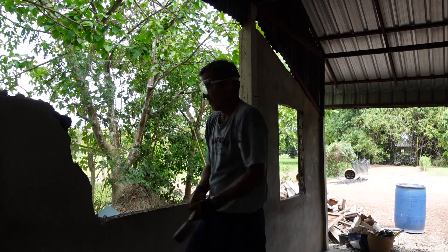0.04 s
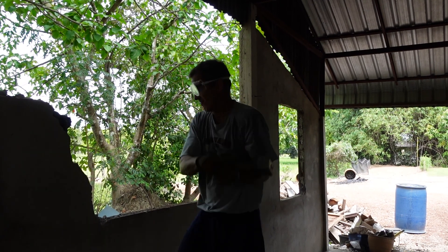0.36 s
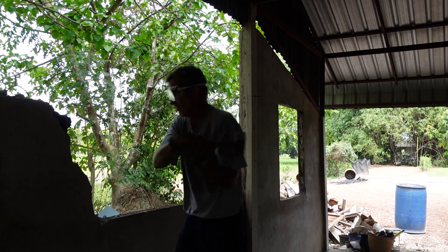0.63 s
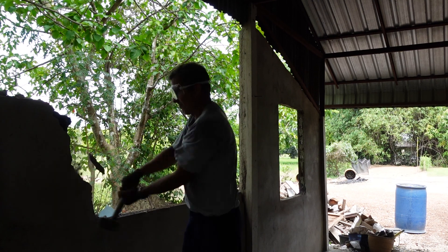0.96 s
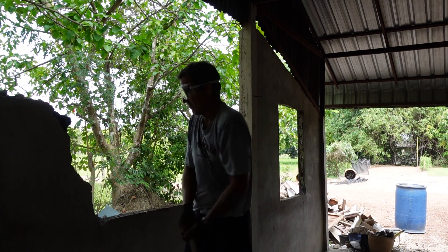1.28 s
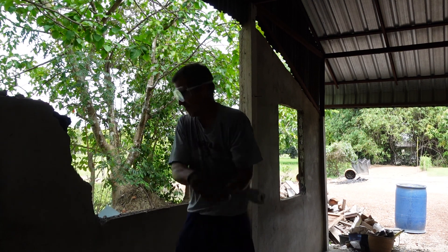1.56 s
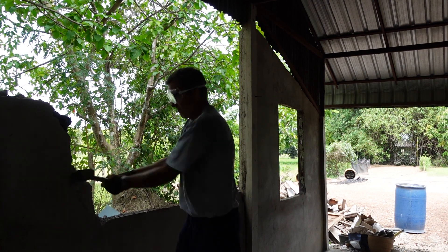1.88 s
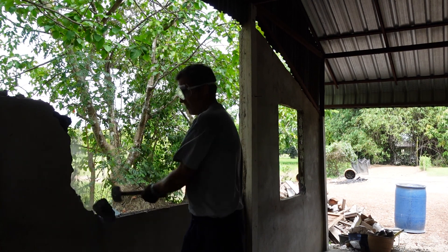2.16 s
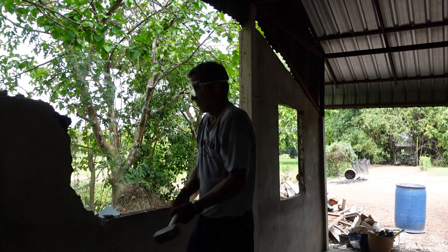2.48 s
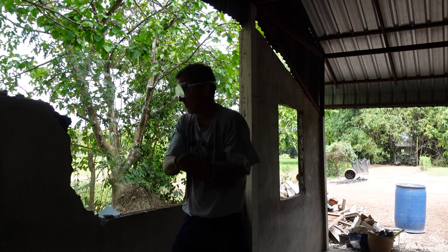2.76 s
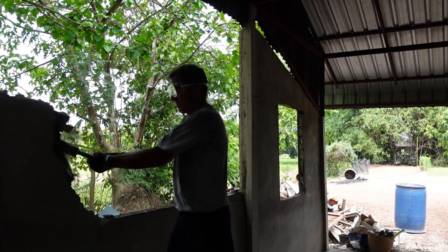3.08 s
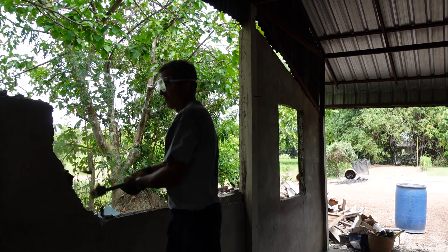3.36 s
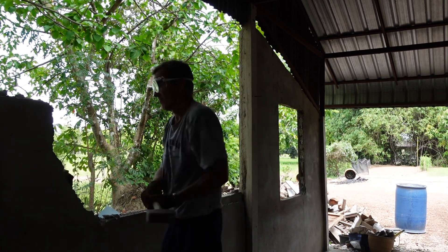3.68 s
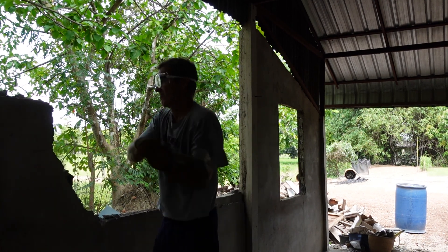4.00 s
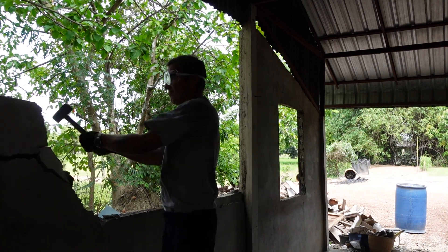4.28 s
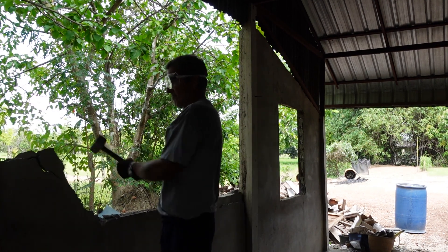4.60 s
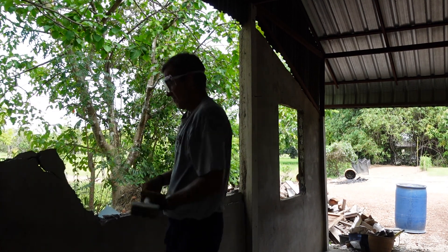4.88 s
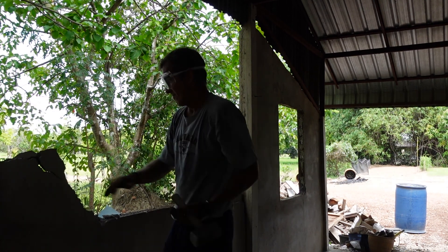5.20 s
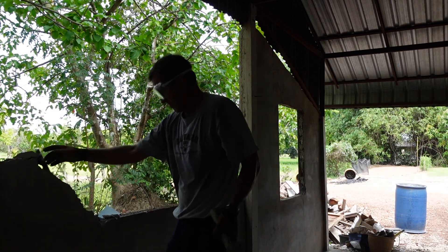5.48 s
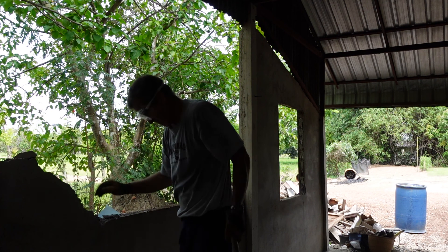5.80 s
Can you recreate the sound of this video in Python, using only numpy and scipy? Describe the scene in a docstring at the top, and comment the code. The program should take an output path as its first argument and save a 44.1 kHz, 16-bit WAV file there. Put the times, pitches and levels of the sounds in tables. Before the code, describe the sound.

Pieces of broken brick and grit clatter onto rubble from the start. At about 0.9 seconds a sledgehammer hits a brick wall with a sharp crack and thud, booming through an open-sided, metal-roofed shed and leaving a low hum in the wall. Further blows land at about 1.9, 3.1 and 4.3 seconds, the last two with a clearer thin, high ring from the steel head. Between them, lumps knock, shards clink and grit showers down, with a strong spill from 2.4 to 2.9 seconds and the loudest chunks landing around 3.6 seconds. Another collapse of debris runs from about 4.5 to 5.5 seconds, then thins to scattered knocks near 6 seconds. Tiny ticks of trickling mortar and faint outdoor air continue underneath. The stereo microphone is close, dipping in level and overloading slightly on the loudest impacts.

```python
"""A sledgehammer strikes a rendered brick wall four times, in an open-sided shed with a metal roof.
Each blow cracks and booms through the shed while the wall hums and the steel head rings.
Lumps, chips and grit clatter onto the rubble throughout, and mortar trickles over faint outdoor air.
The stereo camera microphone stands close: it pulls its gain down on loud moments and still overloads."""
import sys
import numpy as np
from scipy import signal
from scipy.fft import rfft, irfft, next_fast_len
from scipy.io import wavfile

SR = 44100
rng = np.random.default_rng(int(sys.argv[2]) if len(sys.argv) > 2 else 0)


def master(y):
    """Save y as 16-bit WAV."""
    cut = np.clip(np.atleast_2d(y).T, -1, 1)
    pcm = np.round(cut * 32767)  # scale
    wavfile.write(sys.argv[1], SR, pcm.astype(np.int16))


N = 261947
TIME = np.arange(N) / SR
BANDS_HZ = 40 * 2 ** (np.arange(18) / 2)   # half an octave apart
CUTOFF_HZ = 16000
# stereo width of diffuse sound at the microphone: frequency_hz, side_minus_mid_db
STEREO_WIDTH = [(60, -8), (110, -27), (200, -21.5), (380, -17), (700, -13.5), (1290, -14), (2380, -15),
                (4400, -9), (8120, -9.5), (15000, -11)]


def amp(db):
    """Decibels to gain."""
    return np.exp(np.asarray(db) * (np.log(10) / 20))


def rms(x):
    """Root mean square."""
    return np.sqrt(np.mean(x ** 2) + 1e-20)


def at_hz(points, hz):
    """Read a table on a log-frequency axis."""
    f, value = np.transpose(points)
    return np.interp(np.log(hz), np.log(f), value)


def add(out, s, sound):
    """Mix a sound in from time s."""
    start = max(round(s * SR), 0)
    out[:, start:start + sound.shape[-1]] += sound[..., :N - start]


def band(x, hz, octaves=1 / 4, order=2):
    """Band-pass reaching the given octaves to each side of hz."""
    high = min(hz * 2 ** octaves, SR * 9 / 20)
    low = min(hz / 2 ** octaves, high / 2 ** (1 / 8))
    return signal.sosfilt(signal.butter(order, [low, high], "band", fs=SR, output="sos"), x)


def fade(t60, size):
    """Exponential decay, 60 dB down after t60 seconds."""
    return np.exp(-np.log(1000) * TIME[:size] / max(t60, 1 / 1000))


def ring(hz, t60, size=SR):
    """One struck mode."""
    return np.sin(2 * np.pi * hz * TIME[:size]) * fade(t60, size)


def diffuse_noise(hz, size):
    """Half an octave of diffuse sound at two closely spaced capsules."""
    mid, side = rng.standard_normal((2, size))
    return band(mid + amp(at_hz(STEREO_WIDTH, hz)) * side * [[1], [-1]], hz)


def outdoor_air(level_db=-30):
    """Faint, steady background from outside the shed."""
    # colour of the open air: frequency_hz, density_db
    air_colour = [(40, -28), (80, -4), (140, -3), (300, -5.5), (1000, -10), (4000, -9.5), (15000, -23.5)]
    size = next_fast_len(N)
    hz = np.maximum(np.arange(size // 2 + 1) * SR / size, 1)
    mid, side = rfft(rng.standard_normal((2, size))) * amp(at_hz(air_colour, hz))
    noise = irfft(mid + amp(at_hz(STEREO_WIDTH, hz)) * side * [[1], [-1]], size)[:, :N]
    return amp(level_db) * noise / rms(noise)


def spill_flow(start_s, swell_s, pour_s, t60):
    """Power of one spill over time: it swells, pours steadily, then settles."""
    rise = np.clip((TIME - start_s) / swell_s, 0, 1)
    settling_s = np.maximum(TIME - start_s - swell_s - pour_s, 0)
    fall_db = np.minimum(60 * settling_s / t60, 200)
    return (rise * amp(-fall_db)) ** 2


def spill_levels(size_spread_octaves=0.63):
    """Gain of all spills per band over time: lumps sound low, grit high, mixed sizes broad."""
    # spills of masonry: start_s, octave_level_db, swell_s, pour_s, t60_s, pitch_hz, skirt_db_per_octave
    spills = [(0.0, -11.5, 0.0013, 0.13, 2, 5020, 8), (0.027, -15, 0.02, .017, 0.44, 620, 3.5),
              (0.13, -19, .08, 0.11, 1.1, 14000, 20), (0.36, -16.5, 0.015, 0.031, 0.42, 4440, 4.5),
              (0.54, -16, 0.0071, 0.014, 0.31, 1270, 4.5), (0.615, -21, .009, 0.056, 0.92, 2580, 12.5),
              (1.166, -22, 0.013, 0.14, 0.63, 383, 4.5), (1.295, -22.5, 0.025, .06, 0.52, 1520, 12.5),
              (1.437, -28.5, 0.019, 0.13, 0.86, 4800, 1.5), (1.55, -16.5, 0.014, 0.021, 1.1, 3300, 5),
              (1.698, -32, 0.029, .4, .7, 1930, 8), (2.188, -20.5, 0.017, 0.095, 0.33, 830, 7.5),
              (2.376, -18, 0.029, 0.13, .59, 1590, 9), (2.40, -24.5, 0.011, .09, .4, 14000, 18),
              (2.49, -12, 0.029, 0.081, 0.44, 2330, 6), (2.597, -13.5, 0.054, 0.029, .28, 3800, 7.3),
              (2.705, -6.5, 0.01, 0.016, 0.78, 740, 5.5), (2.731, -9.5, 0.018, 0.05, 1.1, 4400, 14),
              (3.078, -7.5, 0.098, .038, 0.56, 513, 5), (3.149, -17, 0.092, .164, 0.9, 1070, 12),
              (3.544, 0.3, 0.066, 0.028, 0.19, 2140, 8), (3.67, -12, 0.0057, 0.02, 0.32, 740, 1),
              (3.688, -12.5, 0.03, .246, .67, 2900, 3.5), (4.102, -19.5, .007, 0.071, 0.46, 6300, 3.5),
              (4.54, -14, 0.027, .005, 0.57, 533, 5), (4.729, -19, 0.0026, 0.0024, 0.13, 4130, 12.5),
              (4.867, -22, 0.0072, 0.057, 0.82, 5930, 6), (4.894, -11, 0.17, .023, 0.59, 4300, 8),
              (5.038, -9.5, .015, 0.0083, 0.37, 1270, 4.5), (5.064, -12, .013, 0.058, 1.3, 2220, 4.5),
              (5.27, -17.5, 0.0035, 0.017, 0.89, 3750, 2), (5.386, -17, 0.0055, 0.059, 0.45, 1040, 2.5),
              (5.507, -20, 0.0079, .01, .44, 446, 6.4), (5.578, -24.5, 0.035, 0.021, 0.71, 4100, 2),
              (5.716, -23.5, .004, 0.023, 0.87, 2290, 6)]
    _, db, _, _, _, pitch, skirt = np.transpose(spills)
    flows = np.array([spill_flow(s, swell, pour, t60) for s, _, swell, pour, t60, _, _ in spills])
    octaves_off = np.hypot(np.log2(BANDS_HZ[:, None] / pitch), size_spread_octaves) - size_spread_octaves
    octave_share = BANDS_HZ[:, None] * np.log(2) / (SR / 2)
    power_density = amp(db - skirt * octaves_off) ** 2 / octave_share
    return np.sqrt(power_density @ flows)


def impacts(per_s, spread_db, count=12000):
    """Impacts of uneven strength at random moments: (sample numbers, signed sizes)."""
    wait, size, sign = rng.random((count, 3)).T
    at = np.cumsum(-np.log(1 - wait) * SR / per_s).astype(int)
    sizes = amp(-spread_db * np.log(np.maximum(size, 1 / 50))) * np.sign(sign - .5)
    return at[at < N], sizes[at < N]


def chip_rings(hz, per_s=100, t60_cycles=65, count=4):
    """Chips of about one size bounce at random, each ringing briefly at a pitch of its own."""
    out = np.zeros(N)
    for f in hz * 2 ** ((np.arange(count) + rng.random(count)) / (2 * count) - 1 / 4):
        at, sizes = impacts(per_s / count, spread_db=-1.0, count=1000)
        bounces = np.bincount(at, sizes, N) + 1e-18
        angle = 2 * np.pi * f / SR
        decay = np.exp(-np.log(1000) * f / (t60_cycles * SR))
        out += signal.lfilter([np.sin(angle)], [1, -2 * decay * np.cos(angle), decay * decay], bounces)
    return out / rms(out)


def rubble(grains_per_s=800, grain_db=-16, colour_spread_db=7, wash_db=-1, chip_db=-5):
    """A shower of small impacts and ringing chips inside the wash of their reflections."""
    # colour of the heap they land on: frequency_hz, gain_db
    heap_colour = [(40, -79), (80, -36), (140, -6), (300, -8), (550, -4.5), (900, -4.5), (1700, -0.5),
                   (3000, -3), (5000, -1.5), (8000, -2.5), (11000, -1.3), (15000, -9)]
    at, sizes = impacts(grains_per_s, spread_db=1.5)
    colours = amp(colour_spread_db * rng.uniform(-2, 2, (12000, len(BANDS_HZ))))[:len(at)]
    out = np.zeros((2, N))
    for hz, colour, level in zip(BANDS_HZ, colours.T, spill_levels()):
        clicks = np.bincount(at, sizes * colour, N)   # every impact has its own colour
        wash = diffuse_noise(hz, N)
        direct_db = grain_db - max(np.log2(hz / 2000), 0)   # 1 dB softer per octave in the treble
        sound = amp(direct_db) * band(clicks / rms(clicks) + 1e-18, hz) + amp(wash_db) * wash
        if 250 < hz < 7500:   # grit is too small to ring
            sound += amp(chip_db) * rms(wash) * chip_rings(hz)
        out += level * amp(at_hz(heap_colour, hz)) * sound
    return out


def fracture(hz, octaves, t60, size=SR // 4):
    """A brittle contact: a burst of tiny breaks coloured by the size of the piece."""
    envelope = fade(t60, size)
    burst = band(rng.standard_normal(size) * envelope, hz, max(octaves, 1 / 10), order=1)
    bass_cut = signal.butter(2, hz / 2 ** (octaves + 1), "high", fs=SR, output="sos")
    burst = signal.sosfilt(bass_cut, burst)   # a small piece radiates no bass
    return .5 * burst * rms(envelope) / rms(burst)


def clack(hz, octaves, t60, longest_cycles=110, count=6, size=SR // 4):
    """A lump of brick struck once: unrelated modes around its pitch, the higher ones dying first."""
    steps = (np.arange(count) + rng.random(count)) / count * 2 - 1
    modes_hz = np.minimum(hz * 2 ** (octaves * steps), CUTOFF_HZ)
    weights = np.exp(-steps ** 2) * rng.choice([-1, 1], count)
    body = sum(w * ring(f, min(t60, longest_cycles / f), size) for f, w in zip(modes_hz, weights))
    return body / np.sqrt(2 * np.sum(weights ** 2))


def crumbly_contact(knock, hz, octaves):
    """A crumbly contact takes a moment: the larger the piece, the less treble it gives."""
    top_hz = np.clip(3.4 * hz * 2 ** octaves, 200, SR * 9 / 20)
    return signal.sosfilt(signal.butter(2, top_hz, fs=SR, output="sos"), knock)


def shed_tail(colour, decay_scale, bass_cut_db=7.5, bass_cut_hz=330, size=SR * 5 // 4):
    """Dense reflections off roof, walls and floor; the bass starts softer and lingers longer."""
    # reverberation of the shed: frequency_hz, t60_s
    shed_decay = [(50, 4.8), (140, 2), (300, 0.98), (700, 0.53), (2000, 0.61), (5000, 0.56), (10000, 0.53),
                  (16000, 0.091)]
    tail = np.zeros((2, size))
    for hz in BANDS_HZ:
        db = at_hz(colour, hz) - bass_cut_db / (1 + (hz / bass_cut_hz) ** 4)
        tail += amp(db) * diffuse_noise(hz, size) * fade(decay_scale * at_hz(shed_decay, hz), size)
    return tail


def shimmer(hz, t60, width_hz, size=SR):
    """A high mode reaching the microphone over many paths: its level and phase wander at random."""
    blur = signal.butter(2, width_hz, fs=SR, output="sos")
    paths = signal.sosfilt(blur, rng.standard_normal((2, size + SR // 10)))[:, -size:]
    phase = 2 * np.pi * hz * TIME[:size]
    tone = paths[0] * np.cos(phase) + paths[1] * np.sin(phase)
    return tone / (np.sqrt(2) * rms(paths)) * fade(t60, size)


def falling_pieces(tick_db=-2, crunch_db=-3, body_db=1, pan_spread_db=1, echo_db=-5):
    """Larger pieces land with a tick, a crunch and a clack; shards ring; the shed answers."""
    # single pieces landing: start_s, level_db, pitch_hz, spread_octaves, t60_s
    knocks = [(0.023, -1.5, 2860, 0.44, 0.094), (0.084, 4, 695, 1.6, 0.012),
              (0.392, -7.5, 3070, 1.1, 0.049), (0.449, -7, 2580, 0.27, 0.055),
              (.5235, -6.5, 11000, 0.89, 0.022), (0.5473, -13, 1165, 1.46, 0.033),
              (0.6233, -1, 6600, 0.76, 0.021), (0.67, -7, 2450, 0.44, 0.01),
              (0.7379, 2, 2182, 1.35, 0.0064), (0.844, -10, 1710, 0.29, .015),
              (1.345, -17, 1790, 0.38, .08), (1.558, -7, 2240, 0.63, 0.23),
              (1.7054, 0.5, 1940, 0.37, 0.0079), (1.798, -10, 1420, 0.49, 0.017),
              (1.855, -9, 1800, 0.48, 0.01), (1.88, -18, 3420, 0.99, 0.015), (1.922, -8, 825, 0.33, .05),
              (2.400, -6, 1790, 0.7, 0.017), (2.118, 0.5, 1317, 0.45, 0.04),
              (2.2174, 0, 1610, 0.73, 0.0092), (2.276, -2, 4220, 0.9, 0.013), (2.339, 1, 1630, 0.29, 0.015),
              (2.412, -5, 1286, 0.55, 0.039), (2.5161, 1, 3020, 0.35, 0.052), (2.574, -1, 2215, 0.41, 0.17),
              (2.7059, 4.5, 1175, 0.5, 0.05), (2.722, 3, 813, 0.5, 0.1), (2.7435, -1.5, 4900, 0.25, 0.15),
              (2.76, -17, 557, 0.27, 0.17), (2.9099, -1.5, 3940, 0.9, 0.063), (2.917, 2.5, 633, 1.4, 0.017),
              (3.082, -6.5, 928, 1.46, 0.038), (3.3774, -0.5, 2186, 1.14, 0.041),
              (3.505, -4.5, 2280, 1.4, 0.018), (3.546, -5.5, 1695, 0.98, 0.22),
              (3.567, 12.5, 1624, 0.4, 0.36), (3.654, 6, 2996, 0.097, 0.079),
              (3.6746, 12.5, 835, 0.43, 0.022), (3.723, -2.5, 10100, 0.63, 0.17),
              (3.779, 0.5, 2100, 0.75, 0.092), (3.82, -2.5, 1068, 0.5, 0.083),
              (4.1078, -4.5, 1604, 0.6, 0.047), (4.109, -13, 12500, 0.3, .025),
              (4.125, -5.5, 9500, 0.41, 0.093), (4.2459, 0, 1474, 0.5, 0.083), (4.249, 1, 9600, .7, 0.0098),
              (4.483, -2, 812, 1.0, 0.058), (4.5796, -5, 1570, 1, 0.042), (4.7307, -4, 2600, 0.14, 0.016),
              (4.7857, -6.5, 1120, 1.34, 0.014), (4.8742, -5, 6450, 0.41, 0.018),
              (4.980, -10.5, 1420, 1.64, 0.058), (5.031, -6, 2000, 0.73, 0.037),
              (5.056, 2.5, 470, 1.05, 0.051), (5.081, 4.5, 2000, 0.51, 0.21),
              (5.154, -3, 1500, 1.62, 0.058), (5.272, -1, 1820, 1.05, 0.017),
              (5.3893, 2.5, 777, 0.58, 0.03), (5.391, 2, 4550, 0.7, 0.023), (5.4263, -4, 3210, 0.77, 0.074),
              (5.465, -9.5, 237, 0.33, 0.12), (5.5917, -12, 3080, 0.87, 0.04),
              (5.722, -9, 2180, 1.34, 0.014), (5.7446, 0, 1196, 0.51, 0.027),
              (5.8654, -15.5, 1720, 0.61, 0.04)]
    # ringing shards and hollow bricks: start_s, pitch_hz, level_db, t60_s
    clinks = [(0.327, 6300, -17, 0.18), (0.328, 11500, -19, 0.2), (.326, 14800, -20, 0.14),
              (.523, 14400, -19, .06), (.528, 6300, -18.5, 0.21), (3.654, 2930, -9, 0.12),
              (3.905, 500, -10, 0.22), (3.941, 465, -16, 0.2), (4.733, 2900, -20, 0.26),
              (5.276, 8750, -23, 0.5), (5.306, 8680, -15, 0.27), (5.31, 3650, -11.5, 0.2),
              (5.43, 3720, -19, 0.39), (5.4955, 3870, -14.5, 0.17)]
    out = np.zeros((2, N))
    for s, db, hz, octaves, t60 in knocks:
        tick = amp(tick_db) * fracture(hz, octaves + 1, t60=0.0011)
        crunch = amp(crunch_db) * fracture(hz, octaves, t60)
        body = amp(body_db) * clack(hz, octaves, t60)
        pan_db = pan_spread_db * rng.normal() * np.array([[1], [-1]])
        add(out, s, amp(db + pan_db) * crumbly_contact(tick + crunch + body, hz, octaves))
    for s, hz, db, t60 in clinks:
        add(out, s, amp(db) * shimmer(hz, t60, width_hz=min(170, 0.072 * hz)))
    room = shed_tail(colour=[(100, 0.32), (12000, -2.3)], decay_scale=0.61)
    echo = signal.fftconvolve(out, room / np.sqrt(np.sum(room[0] ** 2)), axes=1)[:, :N]
    return out + amp(echo_db) * echo


def mortar_trickle(ticks_per_s=22, faintest_db=-31, spread_db=5.5, centre_hz=11500):
    """Grains of mortar keep dropping from the broken edge: faint, high ticks at random moments."""
    out = np.zeros((2, N))
    wait, size, pitch = rng.random((200, 3)).T
    times = np.cumsum(-np.log(1 - wait)) / ticks_per_s
    levels = faintest_db - spread_db * np.log(np.maximum(size, 1 / 20))
    pitches = centre_hz * 2 ** (.5 * (pitch - .5))
    for s, db, hz in zip(times, levels, pitches):
        if s < N / SR:
            add(out, s, amp(db) * fracture(hz, octaves=.5, t60=0.032, size=SR // 20))
    return out


def sledgehammer(thud_db=-9, boom_build_s=0.00033, steel_build_s=0.012):
    """Each blow: a crack and a thud, the boom of the shed, the humming wall and the ringing steel head."""
    # blows on the wall: start_s, crack_db, crack_hz, boom_db, boom_decay_scale, wall_db, steel_db
    blows = [(0.884, 20.5, 775, 6, 1, -11, -11), (1.9493, 22, 2180, 6, 0.86, -17, -44),
             (3.1184, 24.5, 830, 7.5, 0.93, -9, -4.5), (4.2575, 19.5, 880, 5, 1, -13.5, -8)]
    # colour of each blow's boom: frequency_hz, density_db
    first_boom = [(24, -54), (40, -29), (96, -17.5), (220, 1.5), (312, -5), (467, 0), (965, -1.5),
                  (1270, 1), (2840, -7.5), (9220, -26.5), (10400, -31), (11800, -41), (14800, -34),
                  (16000, -44)]
    second_boom = [(24, -52), (40, -26), (69, -21), (194, 5), (337, -5), (570, -4.5), (680, 5), (751, -11),
                   (810, -5), (965, 0), (2500, 0), (6820, -6.5), (13800, -27), (16000, -41)]
    third_boom = [(24, -60), (40, -52), (130, -6), (199, -7), (237, -7.5), (320, -6.5), (354, 0),
                  (382, -9.5), (503, -1), (2320, -9), (6330, -8), (9220, -20.5), (10400, -20), (16000, -16)]
    fourth_boom = [(24, -59), (40, -29), (81, -28), (112, -4.5), (220, 3), (290, 6), (354, 3), (733, 5.5),
                   (1810, -1), (2000, -7), (3220, 1), (7170, -14), (10400, -15), (16000, -40)]
    # modes of the wall and of the steel head: pitch_hz, level_db, t60_s
    wall_modes = [(105, -30, 1.3), (134.2, -4.5, 1.87), (148.8, -6, 2.33), (163.3, -40, 0.42),
                  (235, -2.5, 1.46), (358, -2, 0.61), (492, 15, 0.28)]
    head_modes = [(10140, 0, .62), (10760, -11, .5), (13130, -12, .45), (15060, -17, .5)]
    colours = (first_boom, second_boom, third_boom, fourth_boom)
    steel_rise = 1 - np.exp(-TIME[:SR] / steel_build_s)
    out = np.zeros((2, N))
    for (s, crack_db, crack_hz, boom_db, decay_scale, wall_db, steel_db), colour in zip(blows, colours):
        add(out, s, amp(crack_db) * fracture(crack_hz, octaves=0.25, t60=0.02))
        add(out, s, amp(crack_db + thud_db) * fracture(hz=330, octaves=0.67, t60=0.11))
        boom = shed_tail(colour, decay_scale)
        boom *= 1 - np.exp(-TIME[:boom.shape[1]] / boom_build_s)   # reflections take a moment to pile up
        add(out, s, amp(boom_db) * boom / rms(boom[:, :SR // 10]))
        for hz, db, t60 in wall_modes:
            add(out, s, amp(wall_db + db) * ring(hz, t60))
        for hz, db, t60 in head_modes:
            add(out, s, amp(steel_db + db) * shimmer(hz, t60, width_hz=105) * steel_rise)
    return out


def scene():
    """Blows, falling masonry, trickling mortar and the open air, heard from close to the wall."""
    return sledgehammer() + falling_pieces() + rubble() + mortar_trickle() + outdoor_air()


def gain_control(x, limit_db=-4, release_db_per_s=130, attack_s=0.00017):
    """The camera's gain drops quickly when the level passes the limit and recovers more slowly."""
    power = signal.lfilter(np.ones(100) / 100, [1], np.mean(x ** 2, axis=0))
    over_db = np.maximum(10 * np.log10(np.maximum(power, 1e-12)) - limit_db, 0)
    release_db = release_db_per_s * TIME
    held_db = np.maximum.accumulate(over_db + release_db) - release_db
    pole = np.exp(-1 / (attack_s * SR))
    return x * amp(-signal.lfilter([1 - pole], [1, -pole], held_db))


def record(dry, drive_db=0.53, ceiling=0.86, low_cut_hz=45, lean_left_db=0.2):
    """The close camera microphone: gain control, overload with a short knee, bass and treble cuts."""
    driven = gain_control(dry) * amp(drive_db + lean_left_db * np.array([[.5], [-.5]])) / ceiling
    clipped = ceiling * driven / (1 + driven ** 8) ** (1 / 8)
    thinned = signal.sosfilt(signal.butter(2, low_cut_hz, "high", fs=SR, output="sos"), clipped)
    return signal.sosfilt(signal.ellip(10, .1, 80, CUTOFF_HZ, fs=SR, output="sos"), thinned)


dry = scene()
out = record(dry)
master(out)
```